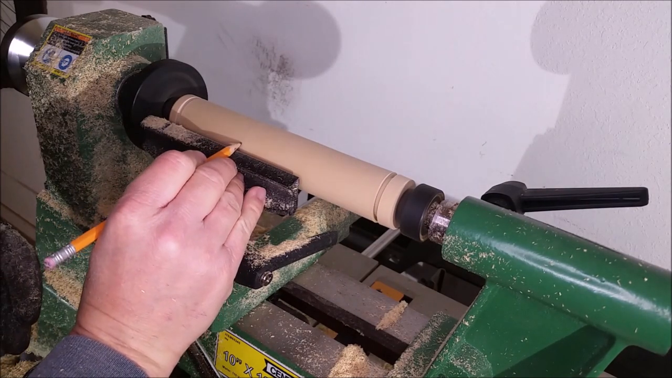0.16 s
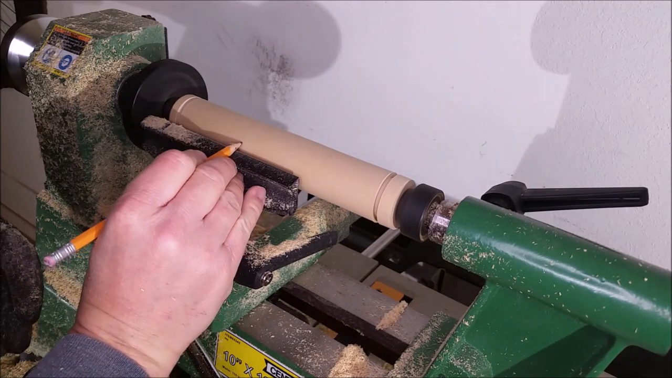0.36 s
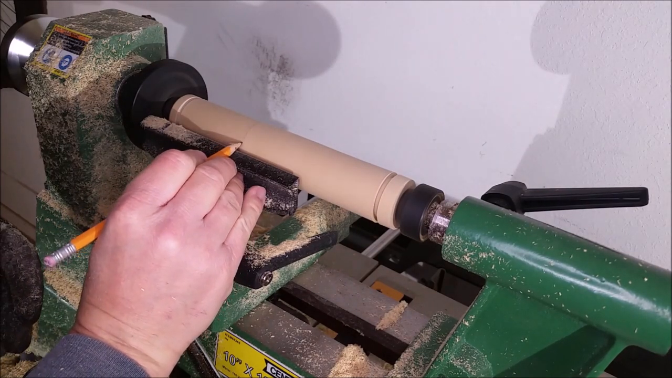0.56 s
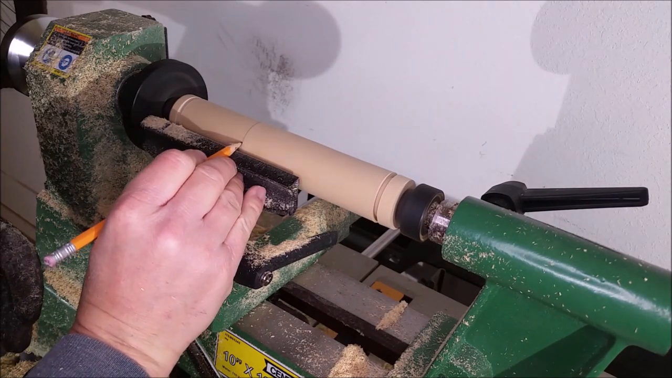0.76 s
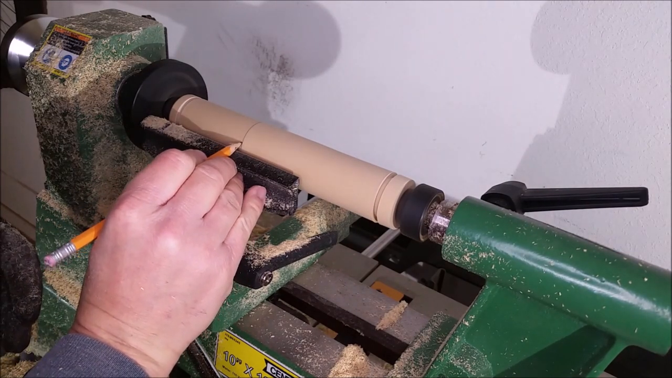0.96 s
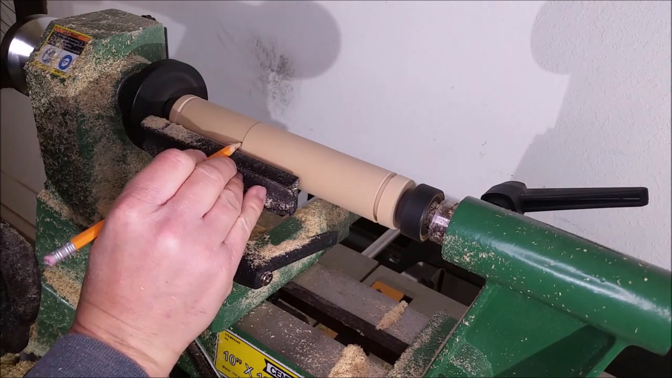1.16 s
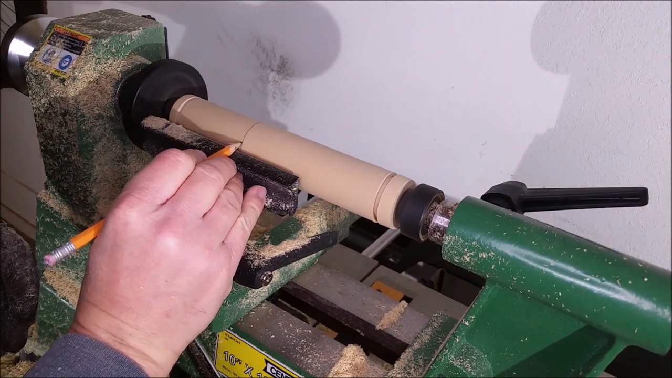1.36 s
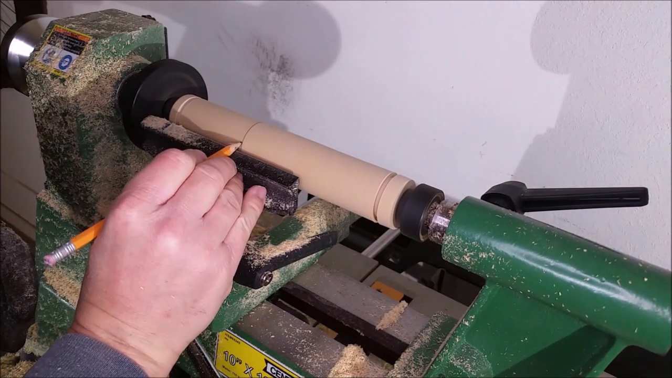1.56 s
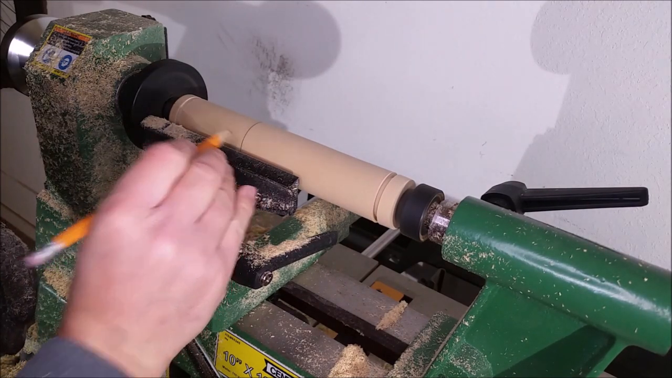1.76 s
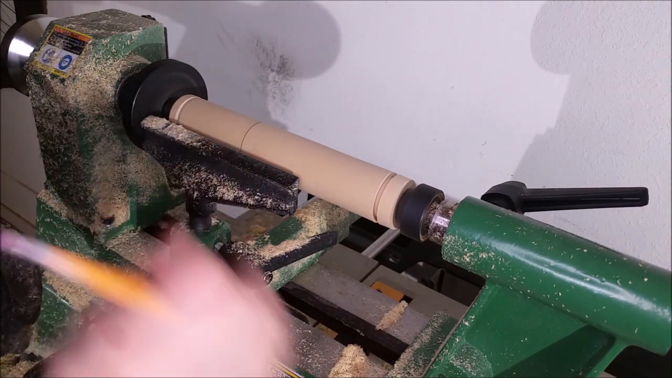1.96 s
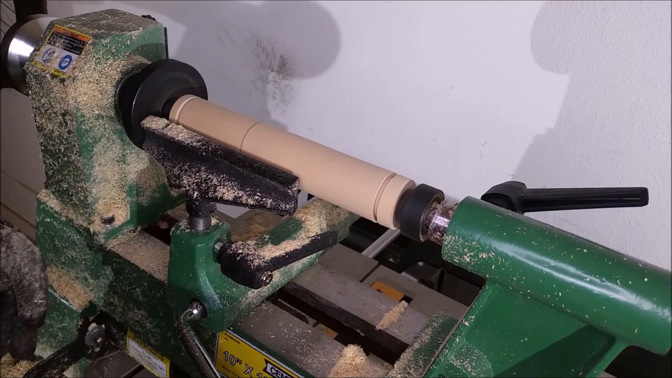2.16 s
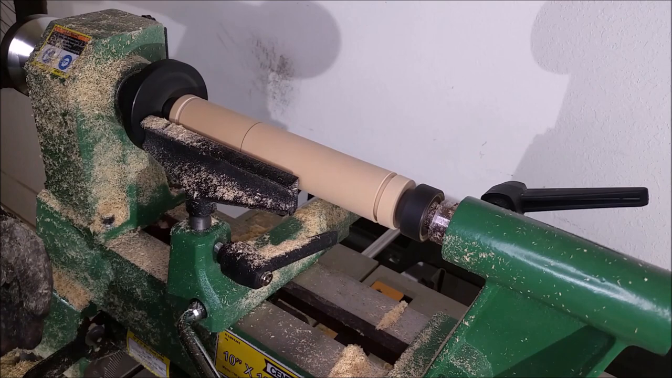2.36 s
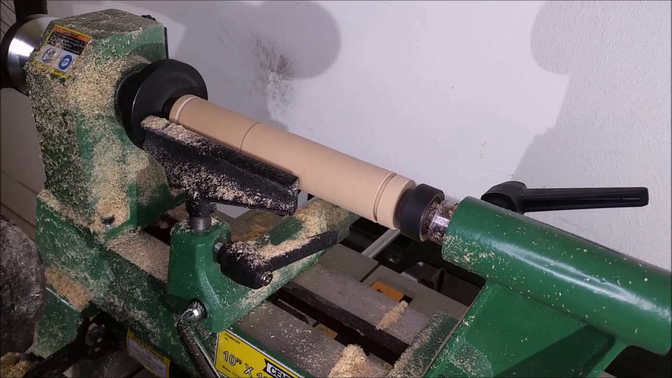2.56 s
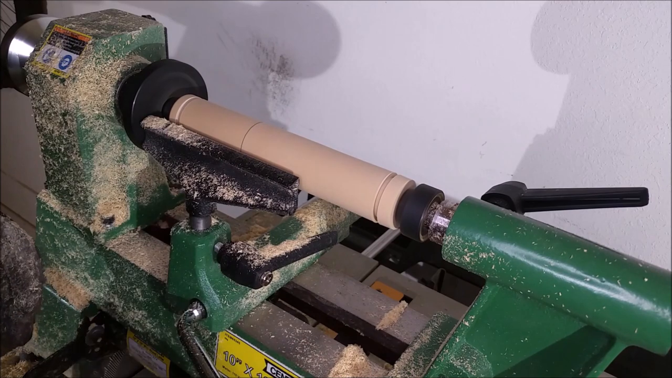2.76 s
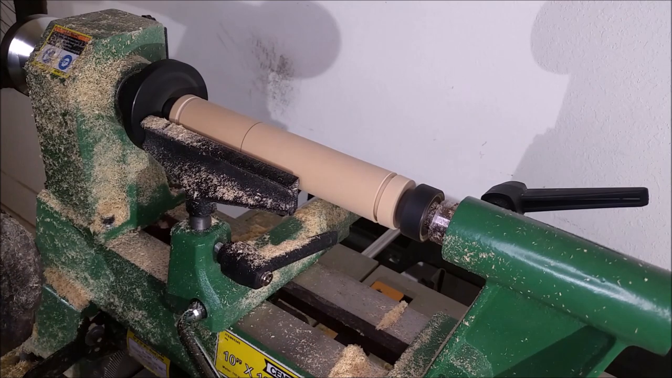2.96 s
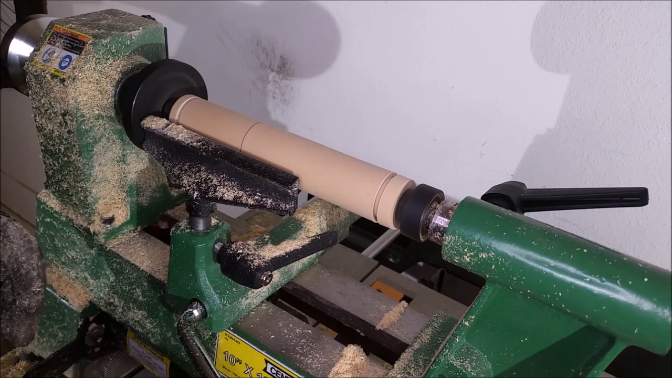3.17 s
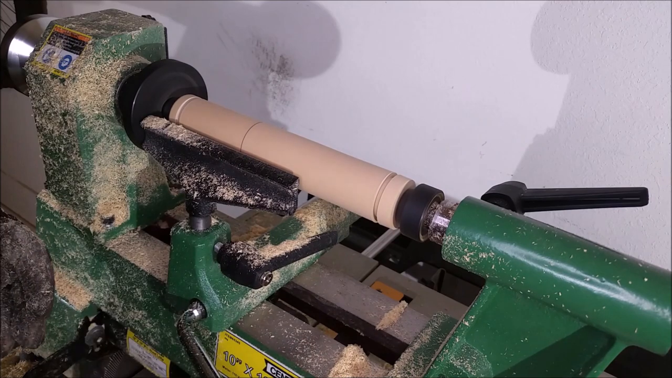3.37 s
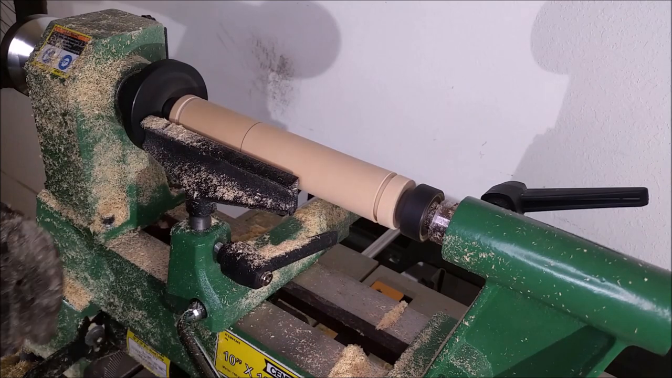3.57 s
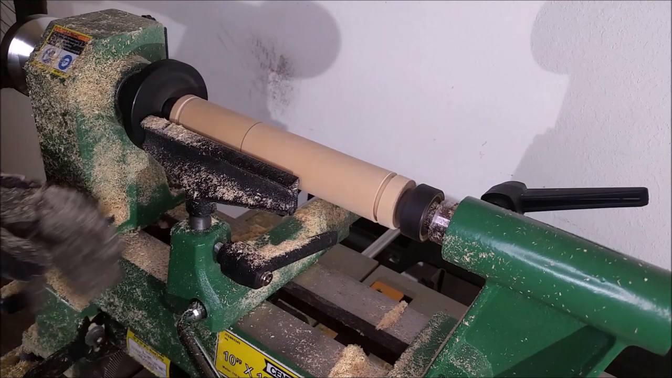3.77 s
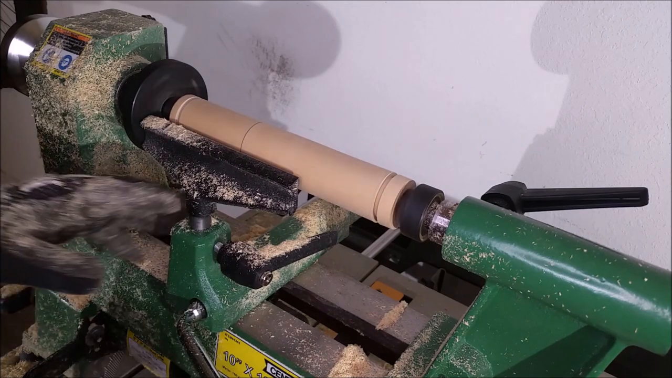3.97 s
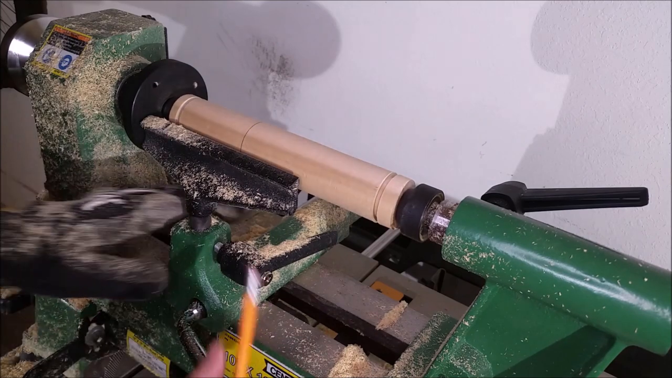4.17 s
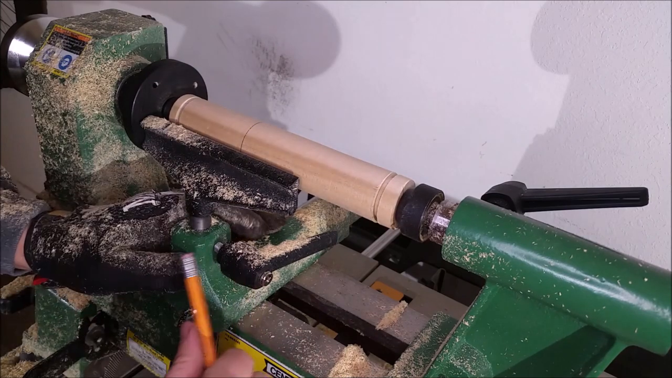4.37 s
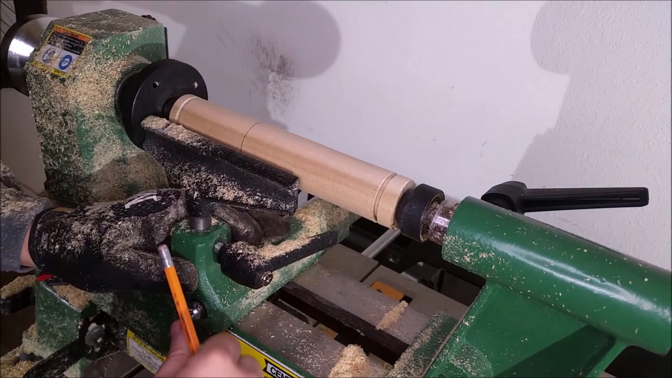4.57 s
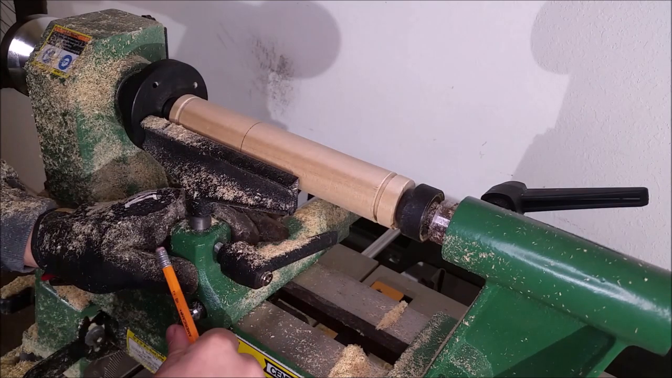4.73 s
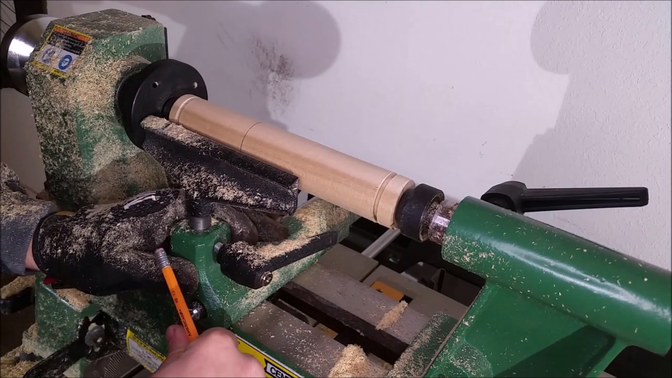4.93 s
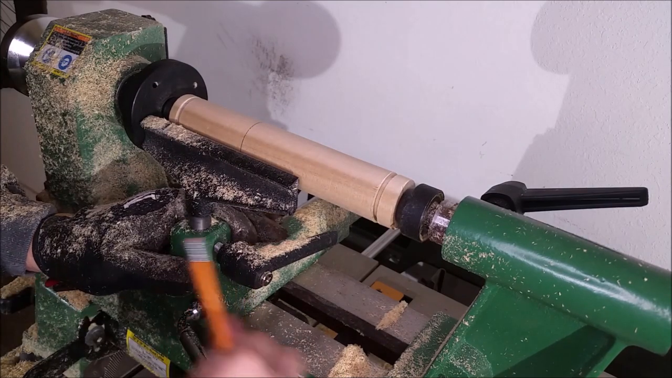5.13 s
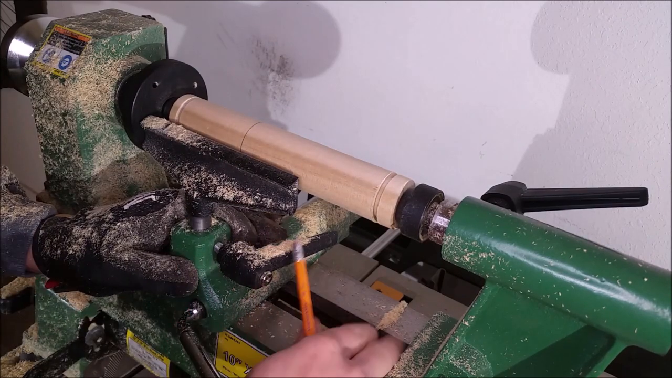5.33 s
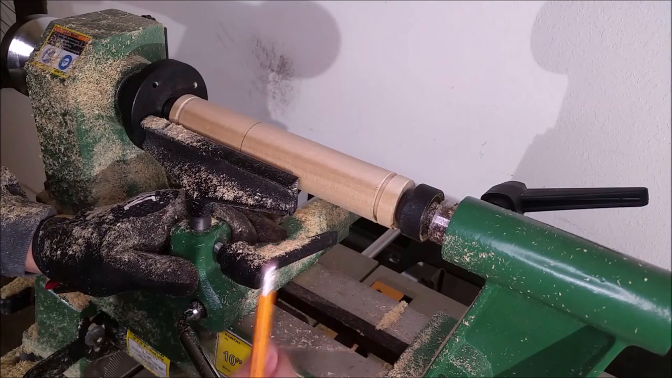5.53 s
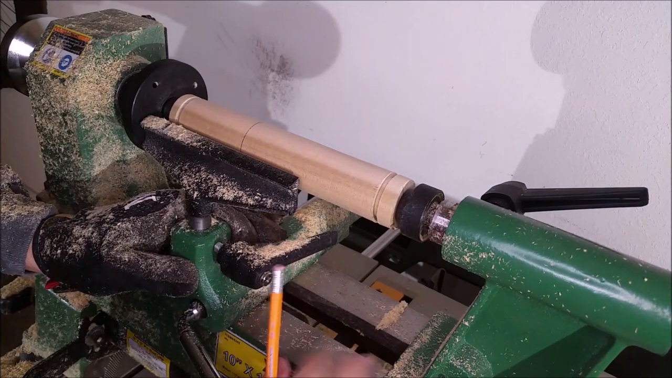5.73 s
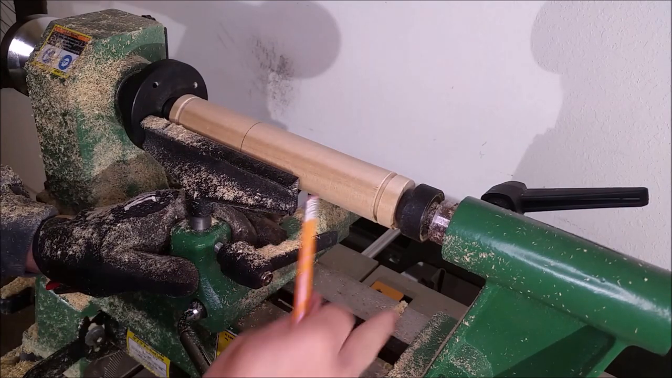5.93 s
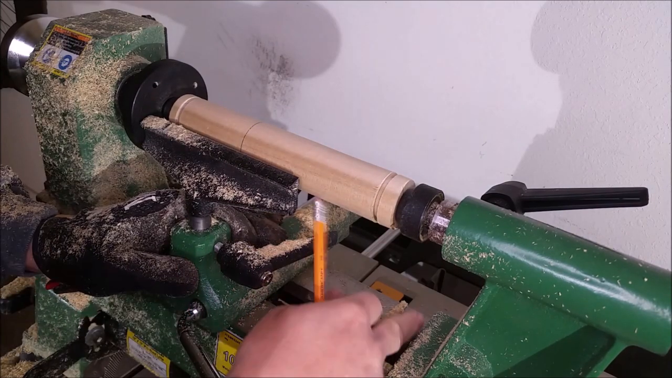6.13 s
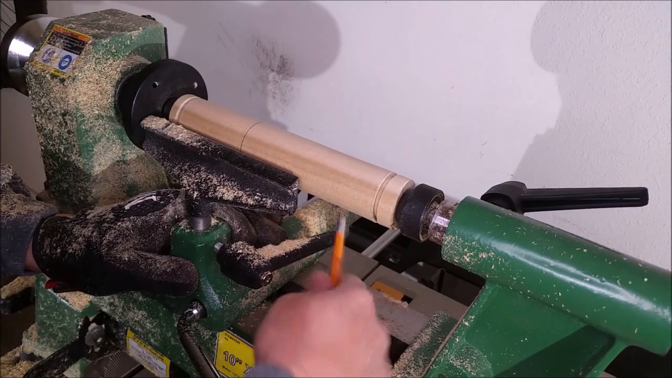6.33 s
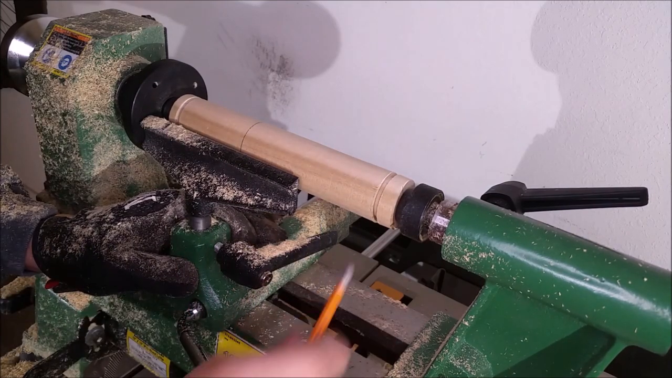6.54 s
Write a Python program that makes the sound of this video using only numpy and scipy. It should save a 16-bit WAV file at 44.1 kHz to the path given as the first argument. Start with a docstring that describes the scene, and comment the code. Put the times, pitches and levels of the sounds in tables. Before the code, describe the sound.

A small wood lathe hums and rattles as a pencil scrapes the spinning wood, then clicks off and winds down, followed by light knocks.

```python
"""A small wood lathe runs close by: its bearings rattle the cast frame and sing over the motor hum.
A pencil marks the spinning blank, hissing, chattering and squealing on the grain.
The switch snaps off and friction brakes the spindle to rest. In the quiet workshop a thin whine
remains, a sleeve rustles, and hands knock lightly against the tool rest and the bed."""
import sys
import numpy as np
from scipy import signal
from scipy.fft import rfft, irfft, next_fast_len
from scipy.io import wavfile
from scipy.ndimage import uniform_filter1d, minimum_filter1d, map_coordinates

SR = 44100
rng = np.random.default_rng(int(sys.argv[2]) if len(sys.argv) > 2 else 0)


def wav_out(sig):
    """Save sig, one row per channel (or a flat mono array), as 16-bit PCM at SR to the path in sys.argv[1]."""
    wavfile.write(sys.argv[1], SR, np.round(np.clip(np.atleast_2d(sig).T, -1, 1) * 32767).astype(np.int16))


N = 291060
T = np.arange(N) / SR
SPINDLE_HZ, OFF_S, COAST_S = 39.65, 2.9475, 1.17


def amp(db):
    """Decibels to gain."""
    return 10 ** (np.asarray(db) / 20)


def unit(x):
    """Scale to rms 1."""
    return x / np.sqrt(np.mean(x ** 2) + 1e-20)


def along(points, hz):
    """Interpolate (f/Hz, value) points on a log axis."""
    f, v = np.transpose(points)
    return np.interp(np.log(hz + 1), np.log(f + 1), v)


def wobble(rate_hz):
    """Smooth random curve, rate_hz knots a second."""
    return map_coordinates(rng.standard_normal(int(N * rate_hz / SR) + 4), [T * rate_hz])


def noise():
    """White noise."""
    return rng.standard_normal(N)


def dying(start_s, t60):
    """Step at start_s, then a fall of 60 dB in t60."""
    return (T >= start_s) * np.exp(-np.log(1000) * np.maximum(T - start_s, 0) / t60)


def swell(centre_s, sigma_s):
    """Gaussian rise and fall."""
    return np.exp(-.5 * ((T - centre_s) / sigma_s) ** 2)


def colour(x, spectrum, modes=()):
    """Minimum-phase filter: a broad spectrum plus resonances."""
    m = 2 * next_fast_len(N // 2 + SR // 4)
    hz = np.fft.rfftfreq(m, 1 / SR)
    db = along(spectrum, hz) + sum(lift / (1 + (2 * (hz - f) / w) ** 2) for f, w, lift in modes)
    cepstrum = irfft(np.log(amp(db)))
    cepstrum[1:m // 2] *= 2
    cepstrum[m // 2 + 1:] = 0
    return irfft(rfft(x, m) * np.exp(rfft(cepstrum)))[:N]


def filtered(x, response):
    """Zero-phase filter with gain response(hz)."""
    m = next_fast_len(N + SR // 2)
    return irfft(rfft(x, m) * response(np.fft.rfftfreq(m, 1 / SR)), m)[..., :N]


def moving_lowpass(x, edge_hz):
    """Swept low-pass at constant power."""
    hz, t, z = signal.stft(x, SR, nperseg=512)
    gain = 1 / np.sqrt(1 + (hz[:, None] / np.interp(t, T, edge_hz)) ** 5.35)
    power = np.mean(abs(z) ** 2, axis=1, keepdims=True)
    gain /= np.sqrt(np.sum(power * gain ** 2, axis=0) / power.sum())
    return signal.istft(z * gain, SR, nperseg=512)[1][:N]


def surface(turns):
    """Roughness of a turning surface, repeated every revolution."""
    size = int(SR / SPINDLE_HZ)
    bumps = irfft(np.exp(2j * np.pi * rng.random(size // 2 + 1)), size)
    return unit(map_coordinates(bumps, [turns % 1 * size], mode='grid-wrap'))


# Room decay: f/Hz, t60/s
WALL_DECAY = [(150, 0.44), (1000, 0.39), (4000, 0.57), (12000, 0.3)]
# Reflection spectrum: f/Hz, level/dB
WALL_SPECTRUM = [(2000, 0.5), (5000, -3.5), (9000, -4.5), (16000, -3.5)]

def walls(x):
    """Diffuse reflections; the top treble is weaker and dies first."""
    hz, t, z = signal.stft(rng.standard_normal(SR // 2), SR, nperseg=256)
    fade = np.exp(-np.log(1000) * t / along(WALL_DECAY, hz)[:, None])
    tail = signal.istft(z * fade * amp(along(WALL_SPECTRUM, hz))[:, None], SR, nperseg=256)[1]
    return signal.fftconvolve(x, tail / np.linalg.norm(tail))[:N]


# Room tones: f/Hz, level/dB
ROOM_TONES = [(59.5, -62.5), (597.5, -73), (624.5, -77), (742.9, -57)]
# Room noise spectrum: f/Hz, level/dB
ROOM_SPECTRUM = [(20, -4), (40, -5), (70, 2.5), (130, -3), (215, -10), (320, -16), (500, -21),
                 (1000, -23.5), (2000, -27.5), (4000, -32), (8300, -40), (10000, -44.5), (12000, -34),
                 (15800, -39)]

def workshop():
    """Low rumble, faint hiss and a thin steady whine."""
    whine = sum(amp(db) * np.sin(2 * np.pi * hz * T + 0.08 * wobble(5)) for hz, db in ROOM_TONES)
    return amp(-53) * unit(colour(noise(), ROOM_SPECTRUM)) + np.sqrt(2) * whine


# Cloth friction spectrum: f/Hz, level/dB
CLOTH_SPECTRUM = [(200, -7.5), (800, -4.5), (2500, -4.5), (5000, -3.5), (8000, -6.5), (12000, 2),
                  (16000, 2.5)]
# Cloth strokes: t/s, level/dB, sigma/s, low-pass edge/Hz
SLEEVE_STROKES = [(3.715, -64, 0.018, 14000), (4.19, -62, 0.16, 3480), (4.43, -63, 0.038, 10000),
                  (4.637, -55.5, 0.12, 3050), (5.559, -51.5, 0.021, 17800), (5.771, -56, 0.0091, 16000),
                  (5.84, -50.5, 0.028, 16870), (6.067, -56, 0.066, 2910), (6.27, -52, 0.13, 2480),
                  (6.42, -48, 0.029, 18400), (6.514, -50, 0.044, 1400), (6.536, -51.5, 0.014, 16100)]

def sleeve():
    """Sleeve and glove slide in short grainy swells."""
    out = np.zeros(N)
    fibres = colour(noise() * amp(1.6 * wobble(200)), CLOTH_SPECTRUM)
    for s, db, sigma_s, edge_hz in SLEEVE_STROKES:
        stroke = unit(filtered(fibres, lambda hz: 1 / (1 + (hz / edge_hz) ** 2)))
        out += amp(db) * stroke * swell(s, sigma_s)
    return out


# Hand contacts: t/s, level/dB, t60/s
HAND_CONTACTS = [(4.14, -52, 0.74), (4.5, -51.5, 0.97), (6.015, -43.5, 0.87), (6.45, -52, 1.5)]

def handling(rise_s=0.014):
    """A hand settles on the machine: a dull, dying rumble."""
    spectrum = [(25, -18), (65, -1), (130, -4), (240, -3), (350, -6.5), (500, -4),
                (900, -40), (3000, -69)]
    level = sum(amp(db) * dying(s, t60) * np.clip((T - s) / rise_s, 0, 1) for s, db, t60 in HAND_CONTACTS)
    return level * unit(colour(noise(), spectrum))


# Bed and tool rest modes: f/Hz, relative level/dB, t60/s
BED_MODES = [(479, -2, 0.52), (669, 3, 0.22), (687.5, 10, 0.17), (1113, -2.5, 0.12), (1173, 1, 0.12),
             (1457, -3.5, 0.23), (1780, -7, 0.18), (1834, -2.5, 0.24), (2950, 7, 0.039), (3080, 4, 0.054),
             (3480, -10, .15), (3640, -13, 0.22), (4280, -9, 0.09), (4540, -14, 0.12)]
# Knocks: t/s, level/dB, favoured f/Hz (higher when harder), relative crack level/dB
HAND_KNOCKS = [(4.497, -40, 1610, -10), (5.975, -43.5, 11000, 7), (6.028, -33.5, 4270, -5),
               (6.042, -43, 3800, -3), (6.063, -29.5, 905, 0.5), (6.235, -38.5, 1000, -20),
               (6.426, -35.5, 3100, -0.5)]

def knocks():
    """Each touch cracks briefly and rings the modes nearest its pitch."""
    out = np.zeros(N)
    t = np.arange(SR // 2) / SR
    hz, mode_db, t60 = np.transpose(BED_MODES)[:, :, None]
    decay = np.exp(-np.log(1000) * t / t60)
    for s, db, pitch_hz, crack_db in HAND_KNOCKS:
        strength = amp(mode_db + rng.normal(0, 0.54, hz.shape))
        strength /= 1 + (np.log2(hz / pitch_hz) / 0.41) ** 2
        # loose joints blur the high modes
        drift = np.cumsum(rng.standard_normal((len(hz), len(t))), axis=1) * hz / SR * .7
        ring = np.sum(strength * np.sin(2 * np.pi * hz * t + drift) * decay, axis=0)
        softness = signal.butter(2, min(1.1 * pitch_hz + 2200, .4 * SR), fs=SR, output='sos')
        crack = unit(signal.sosfilt(softness, rng.standard_normal(len(t))))
        crack_t60 = .02 * np.sqrt(2000 / pitch_hz)
        crack *= np.exp(-np.log(1000) * t / crack_t60)
        rise = 1 - np.exp(-t * pitch_hz / 3.5)  # soft touches ring up slowly
        part = out[round(s * SR):][:len(t)]
        part += amp(db) * (ring * rise + amp(crack_db) * crack)[:len(part)]
    return out


# Switch crack spectrum: f/Hz, level/dB
SNAP_SPECTRUM = [(100, -24), (400, -8.5), (800, -8.5), (2000, -26.5), (3300, 8.5), (4800, -5), (6000, 0),
                 (9000, -5), (11000, -5.5), (16000, 1)]
# Sheet housing spectrum: f/Hz, level/dB
HOUSING_SPECTRUM = [(60, -18.5), (130, -2), (250, -4.5), (600, 4), (1000, 6), (1700, 2.5), (2700, -21),
                    (3800, -4.5), (5000, -11.5), (8500, -19), (11000, -36), (16000, -30.5)]

def switch():
    """The switch snaps over; its housing thunks and rattles."""
    snap = amp(6.5) * unit(colour(noise(), SNAP_SPECTRUM)) * dying(OFF_S, .008)
    housing = unit(colour(noise(), HOUSING_SPECTRUM))
    thunk = amp(-6) * dying(OFF_S, 0.033)
    rattle = amp(-21.5) * dying(OFF_S, 0.7)
    return snap + housing * (thunk + rattle)


TOUCH_S, LIFT_S, RELEASE_T60_S = 0.465, 1.799, 0.22

def pressure(tau_s=.16):
    """The hand leans on the pencil after the touch: 0 to 1."""
    return 1 - np.exp(-np.maximum(T - TOUCH_S, 0) / tau_s)


# Stick-slip tones: f/Hz, level/dB at full pressure
SQUEAL_TONES = [(4632, -36), (6246, -38.5), (12240, -38)]

def squeal():
    """The lead sticks and slips: wavering whistles that grow with pressure."""
    tones = sum(amp(db + 1.4 * wobble(25)) * np.sin(2 * np.pi * hz * T + 1.3 * wobble(60))
                for hz, db in SQUEAL_TONES)
    return np.sqrt(2) * tones * pressure() * ((T < LIFT_S) + dying(LIFT_S, RELEASE_T60_S))


# Pencil and tool rest modes: f/Hz, width/Hz, lift/dB
REST_MODES = [(594, 10, 16), (697, 30, 19), (1070, 12, 13.5), (1114, 22, 15), (1611, 35, 7.5),
              (1703, 100, 11), (1778, 62, 8.5), (1914.5, 30, 12.5), (1949, 45, 12.5), (2100, 120, 9),
              (2785, 94, 11.5), (3200, 68, -3), (4170, 100, 7.5), (4700, 425, 17), (5150, 80, -6.5),
              (6204, 66, 16), (8480, 120, 8), (10500, 100, 8.5), (10800, 250, 9.5), (11700, 260, 4.5),
              (12300, 180, 7)]
# Pencil chatter spectrum: f/Hz, level/dB
CHATTER_SPECTRUM = [(200, -41.5), (500, -8), (1000, -7), (1400, -0.5), (1800, 0), (2400, -3.5),
                    (3400, -1.5), (4500, -16), (6200, -15), (7500, -30.5), (16000, -70)]
# Graphite hiss spectrum: f/Hz, level/dB
HISS_SPECTRUM = [(1000, -34.5), (3000, -8.5), (5000, -10.5), (6300, -11), (7500, -11), (9500, -8),
                 (11300, -4.5), (12700, 3), (13700, -2), (14500, -14), (15700, -4.5)]

def pencil(travel_s, bite_s=0.0076, flick_s=.008, groove_db_per_s=2):
    """The lead rides the same grain each turn, hissing and chattering against the tool rest."""
    force = pressure()
    touching = np.clip((T - TOUCH_S) / bite_s, 0, 1) * (T < LIFT_S)
    turns = travel_s * SPINDLE_HZ + .0004 * wobble(25)
    angle = 2 * np.pi * turns
    # a light touch catches only the two high spots of the oval blank
    lightness = (1 - force) ** 2
    contact = amp((1.2 + 5 * lightness) * np.cos(2 * angle) - 2 * lightness)
    coarse_grain = amp(1.3 * np.cos(angle) + 2 * np.cos(5 * angle))
    fine_grain = amp(np.cos(5 * angle) + 1.3 * np.cos(8 * angle))
    scrape = surface(turns) + .55 * noise()
    chatter = unit(colour(contact * coarse_grain * scrape, CHATTER_SPECTRUM, REST_MODES))
    rub = surface(turns) + noise()
    hiss = unit(colour(contact * fine_grain * rub, HISS_SPECTRUM, REST_MODES))
    chatter_db = -19.5 + groove_db_per_s * (np.minimum(T, LIFT_S) - LIFT_S)  # the lead wears a groove
    hiss_db = -28 - 3.5 * (1 - force) + 2 * swell(LIFT_S - flick_s, flick_s)  # it flicks off the wood
    chatter *= amp(chatter_db) * force ** 1.8 * (touching + dying(LIFT_S, RELEASE_T60_S))
    hiss *= amp(hiss_db) * (touching + dying(LIFT_S, t60=.045))
    return chatter + hiss


# Spindle swish spectrum: f/Hz, level/dB
SWISH_SPECTRUM = [(1000, -14), (2200, 2.5), (4000, 4), (6000, -1), (9000, -9.5), (10700, -6), (11600, 0),
                  (14000, -6), (16000, -7.5)]

def swish(speed):
    """Dry hiss of the turning spindle, fading with speed."""
    return amp(-55.5) * speed ** .9 * unit(colour(noise(), SWISH_SPECTRUM))


# Motor tones: f/Hz, level/dB
MOTOR_TONES = [(119.8, -42.5), (144.3, -44.5), (155, -50)]

def motor():
    """Magnetic hum and rotor throb, ended by the switch."""
    hum = sum(amp(db + wobble(4.1)) * np.sin(2 * np.pi * hz * T + .15 * wobble(6.9))
              for hz, db in MOTOR_TONES)
    return np.sqrt(2) * hum * ((T < OFF_S) + dying(OFF_S, t60=0.31))


# Bearing and belt partials: f/Hz at full speed, relative level/dB
DRIVE_TONES = [(263.8, -52.5), (328.4, -48), (425.3, -41), (640.6, -39.5), (678.3, -53), (759, -41.5),
               (852, -33), (996, -30), (1057, -43), (1114, -44), (1238, -38.5), (1277, -37), (1357, -38.5),
               (1491, -38.5), (1626, -43), (1706, -54), (1911, -39), (2131, -38.5), (2340, -38)]

def drive_singing(travel_s):
    """Bearings and belt sing in wavering partials that sink away at power-off."""
    tones = sum(amp(db + 1.5 * wobble(9)) * np.sin(2 * np.pi * hz * travel_s + 0.57 * wobble(22.02))
                for hz, db in DRIVE_TONES)
    return amp(-0.5) * np.sqrt(2) * tones * ((T < OFF_S) + dying(OFF_S, t60=0.21))


def coasting_frame(contacts, speed, throb_period_s=.245, throb_peak_s=3.16):
    """The frame rings freely and throbs; its low groan lasts longest."""
    ring_spectrum = [(300, -60.5), (665, 10), (1400, -34), (6000, -55.5)]
    groan_spectrum = [(120, -48), (255, -9.5), (450, 5), (700, -15.5), (5000, -43)]
    ring = unit(colour(contacts, ring_spectrum, modes=[(657, 17.4, 17.7)]))
    groan = unit(colour(contacts, groan_spectrum, modes=[(258.7, 27, 39.5), (459, 48, 17)]))
    throb = amp(1.6 * np.cos(2 * np.pi * (T - throb_peak_s) / throb_period_s))
    excitation = np.minimum(speed / 0.18, 1)
    return amp(-4) * excitation * throb * ring + amp(-4 - 19.5 * speed) * groan


# Rough running: t/s, sigma/s, extra rattle/dB, zing level/dB
ROUGH_RUNNING = [(0.116, 0.071, 1.7, -41), (2.245, 0.07, 0.9, -43.5)]
# Rough-running zing spectrum: f/Hz, level/dB
ZING_SPECTRUM = [(2000, -16), (4400, -1), (6300, -12.5), (7500, -22.5), (16000, -49.5)]
# Bearing modes: f/Hz, width/Hz, lift/dB
BEARING_MODES = [(4510, 90, 10), (6350, 200, 7)]
# Rolling contact spectrum: f/Hz, level/dB
ROLLING_SPECTRUM = [(30, -13.5), (100, -9.5), (200, -8.5), (500, -4.5), (800, -1.5), (1050, 2), (1450, -3),
                    (2000, -4.5), (2600, -5.5), (3800, -10.5), (5500, -19), (8000, -32), (12000, -27),
                    (16000, -34)]
# Cast frame modes: f/Hz, width/Hz, lift/dB
FRAME_MODES = [(250.6, 6.8, 11), (475, 39, 6), (660.8, 39, 13.5), (1073, 146, 4), (1760, 230, 7),
               (2254, 70, 5.5), (2577, 70, -4), (3067, 250, 8.5), (3474, 70, 7.5), (4504, 60, 5),
               (6350, 120, 5)]

def bearings(speed, travel_s, ball_pass_hz=213, slacken_s=0.23):
    """Balls chatter in their races and shake the frame; slower contacts are softer and duller."""
    belt_load = np.exp(-np.maximum(T - OFF_S, 0) / slacken_s)
    ball_phase = 2 * np.pi * ball_pass_hz * travel_s + 2.03 * wobble(30)
    passes = amp(2.1 * np.cos(ball_phase) + 0.94 * wobble(220))
    contacts = passes * (noise() + 0.37 * surface(travel_s * SPINDLE_HZ))
    rattle = unit(colour(contacts, ROLLING_SPECTRUM, FRAME_MODES))
    rattle = moving_lowpass(rattle, edge_hz=520 + 1930 * speed + 8700 * belt_load ** 3)
    zing = unit(colour(contacts, ZING_SPECTRUM, BEARING_MODES))
    zing *= sum(amp(db) * swell(s, sigma_s) for s, sigma_s, _, db in ROUGH_RUNNING)
    coasting = np.clip((T - OFF_S) / 0.11, 0, 1)
    frame = amp(-1 + .5 * coasting) * rattle + coasting * coasting_frame(contacts, speed)
    rough_db = sum(db * swell(s, sigma_s) for s, sigma_s, db, _ in ROUGH_RUNNING)
    level_db = -30 + 6 * belt_load + 21.5 * np.log10(speed + 1e-6) + rough_db + 0.42 * wobble(20)
    return amp(level_db) * frame + zing


# Stereo balance: f/Hz, left minus right/dB
BALANCE = [(1100, 0), (2200, -0.05), (3200, 3), (4400, 5), (6300, 7.5), (8300, 0), (10000, -2.5),
           (15000, 0.5)]

def scene():
    """Lathe and workshop, nearly mono, leaning left in the upper middle."""
    speed = np.clip(1 - (T - OFF_S) / COAST_S, 0, 1)  # share of full speed
    travel_s = np.cumsum(speed * (1 + 0.000531 * wobble(4))) / SR  # rotation as time at full speed
    near = pencil(travel_s) + squeal() + switch() + knocks() + sleeve()
    near += bearings(speed, travel_s) + swish(speed)
    mono = near + amp(-9.5) * walls(near) + drive_singing(travel_s) + motor() + handling() + workshop()
    # reflections differ left to right only at short wavelengths
    side_spectrum = [(300, -65.5), (500, -59.5), (750, -42.5), (1500, -36.5), (2800, -26.5),
                     (4500, -11), (7000, -11.5), (10000, -21.5), (14000, -16.5)]
    side = colour(walls(mono), side_spectrum)
    pair = np.array([mono + side, mono - side])
    return filtered(pair, lambda hz: amp(np.outer([.5, -.5], along(BALANCE, hz))))


def record(dry, threshold=1.6, ceiling=.9, top_hz=15830):
    """Look-ahead limiter, soft saturation, band limit."""
    needed_gain = np.minimum(1, threshold / (abs(dry).max(axis=0) + 1e-9))
    hold, ramp = int(.032 * SR), int(.006 * SR)
    held_gain = minimum_filter1d(needed_gain, hold, origin=hold // 5)
    ducked = dry * uniform_filter1d(held_gain, ramp)
    rounded = ducked / (1 + (ducked / ceiling) ** 6) ** (1 / 6)
    return filtered(rounded, lambda hz: np.clip((top_hz - hz) / 400 + .5, 0, 1))


dry = scene()
out = record(dry)
wav_out(out)
```